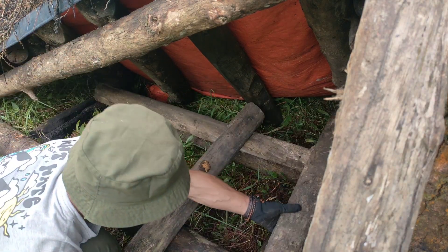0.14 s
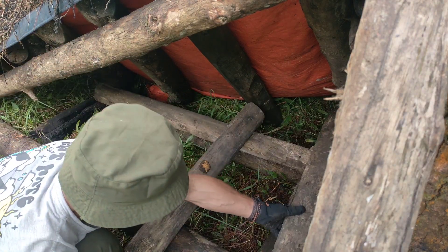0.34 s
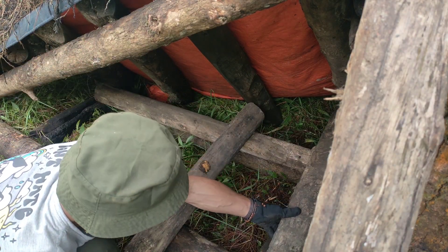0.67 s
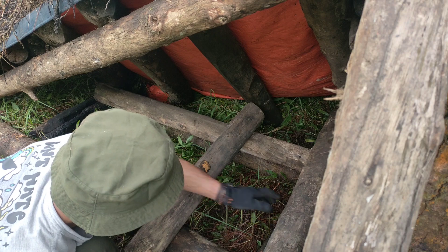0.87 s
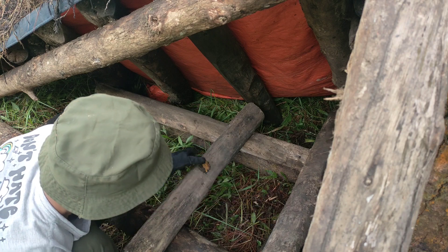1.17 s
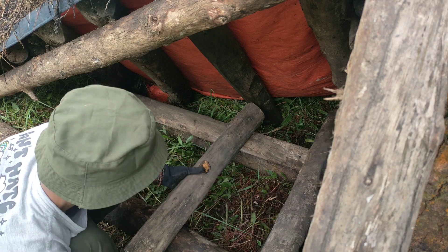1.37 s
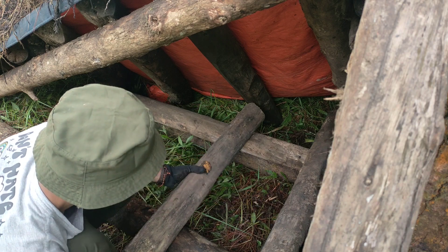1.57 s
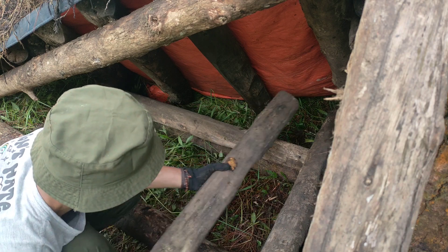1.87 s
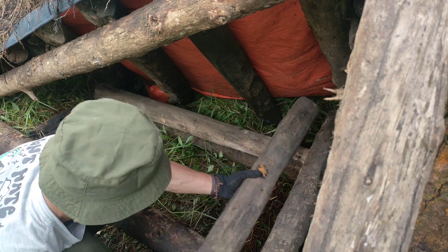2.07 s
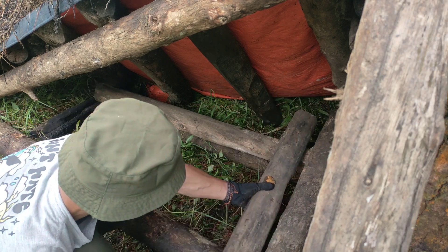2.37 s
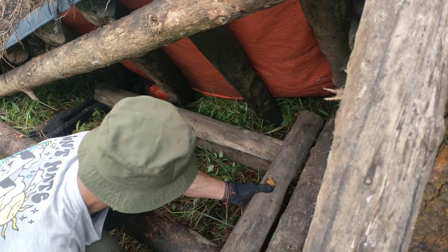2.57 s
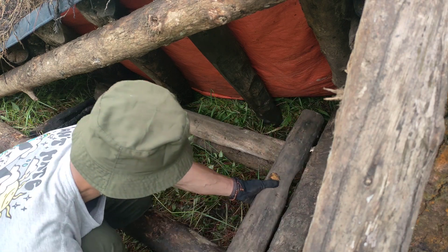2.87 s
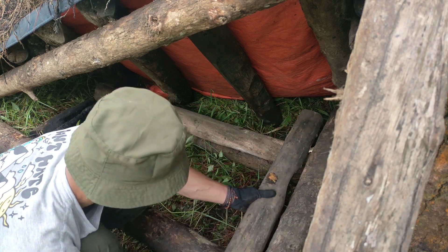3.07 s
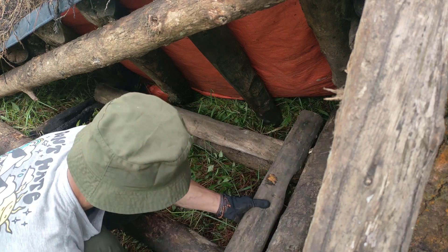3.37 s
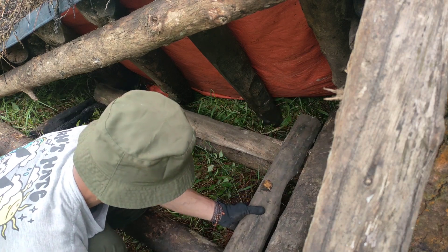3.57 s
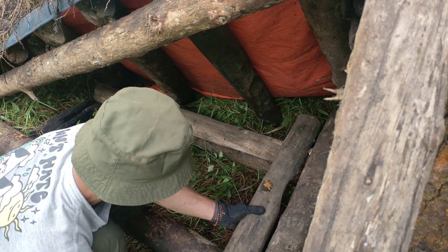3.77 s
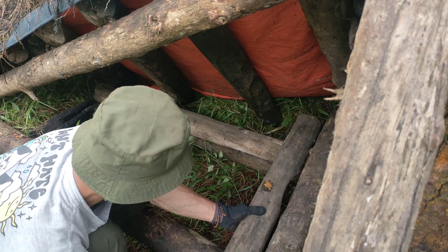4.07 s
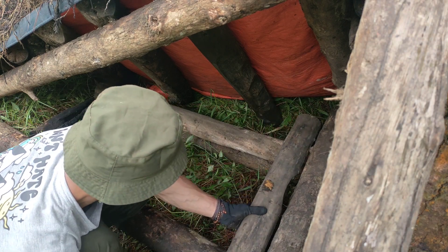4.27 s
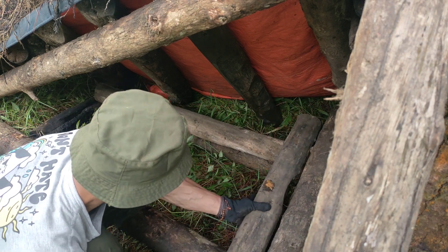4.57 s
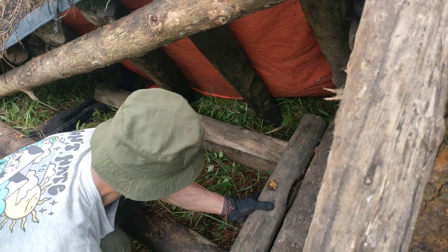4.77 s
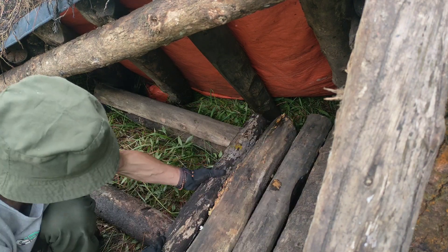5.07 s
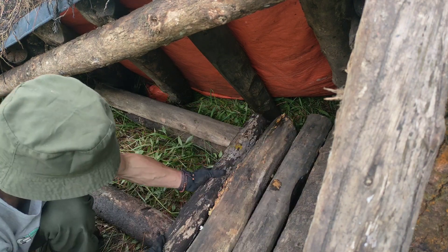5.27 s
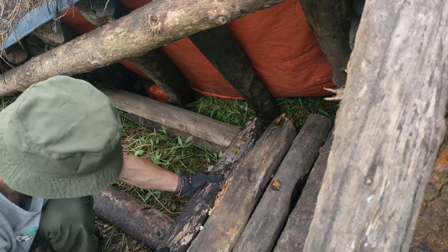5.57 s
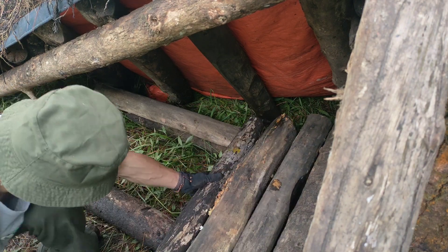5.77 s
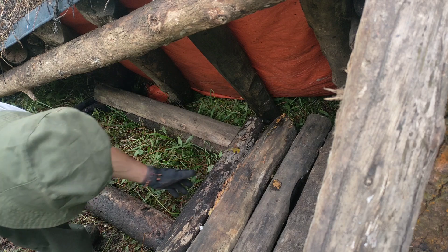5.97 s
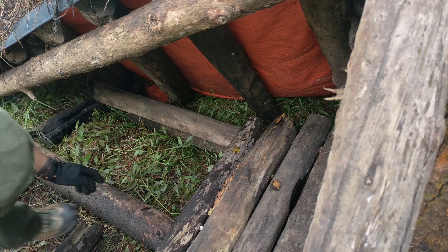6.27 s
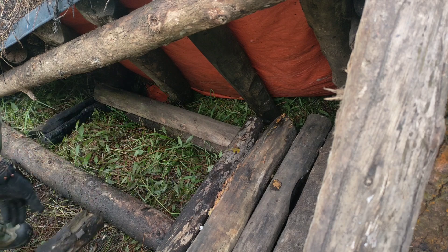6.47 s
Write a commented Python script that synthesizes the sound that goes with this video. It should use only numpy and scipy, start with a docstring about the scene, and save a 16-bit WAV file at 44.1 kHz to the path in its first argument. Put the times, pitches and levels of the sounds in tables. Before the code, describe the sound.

Outdoors, three logs are set down with short woody knocks between gritty scrapes and cloth rustle, over soft leaf hiss and rare bird chips.

```python
"""Three dry logs are laid one after another on a timber frame in a forest: each knock is a contact thud,
decaying sine modes and cracks of band noise. Noise bursts make bark ticks and low woody puffs; shaped,
gritty noise makes the rustle and scrapes of gloves and clothes; sagging sines make soft thumps. A far drone
and leaf hiss of filtered noise come from the right over an air rumble; a small bird chips in falling sines."""
import sys
import numpy as np
from scipy import signal
from scipy.fft import rfft, irfft, next_fast_len
from scipy.io import wavfile
from scipy.ndimage import uniform_filter1d

SR = 44100
rng = np.random.default_rng(int(sys.argv[2]) if len(sys.argv) > 2 else 0)


def convert_level_to_amplitude(level_db):
    """Map a level in decibels to its linear amplitude factor."""
    exponent = np.asarray(level_db, float) / 20
    return 10 ** exponent


def materialize(psi):
    """Save the field psi as 16-bit PCM at rate SR to the path in sys.argv[1].

    A 1-D psi becomes a single channel; in a 2-D psi each row is a channel.
    """
    bounded = np.clip(np.atleast_2d(psi).T, -1, 1)
    quanta = np.round(bounded * 32767).astype(np.int16)
    wavfile.write(sys.argv[1], SR, quanta)


N = 292383  # samples

# Course of the far drone. Each row: time in seconds, level in dB,
# blend from the single-band colour (0) to the many-band colour (1).
DRONE_COURSE = [(0.0, -55.5, 0.22), (0.74, -54.5, 0.22), (1.0, -56.5, 0.07), (2.23, -58, 0.47),
                (2.46, -58.5, 0.57), (3.17, -59, 0.7), (3.51, -58.5, 0.5), (3.84, -54, 0.44),
                (4.71, -52, 0.9), (4.89, -49, 0.5), (5.5, -50, 0.83), (6.39, -48, 0.5), (6.63, -47.5, 0.3)]
# Drone colour centred near 160 Hz. Each row: frequency in Hz, relative level in dB per Hz.
DRONE_SINGLE_BAND = [(59, -43), (100, -24), (162, -1), (291, -19), (350, -17.5), (389, -27), (687, -26),
                     (764, -21), (1000, -31), (1300, -53), (2200, -120)]
# Drone colour of several low humming bands. Each row: frequency in Hz, relative level in dB per Hz.
DRONE_MANY_BANDS = [(50, -34), (78, -2), (100, -5.5), (124, -18), (156, 0.5), (204, -0.5), (231, -3),
                    (265, -12.5), (280, -17.5), (357, 0.5), (389, -12), (589, -10), (648, -15.5),
                    (742, -18), (1000, -41.5), (1300, -47), (2200, -120)]
# Spectrum of the air rumble. Each row: frequency in Hz, relative level in dB per Hz.
RUMBLE_SPECTRUM = [(12, -26.5), (20, -9), (80, 0), (110, -7), (140, -20), (240, -120)]
# Swell of the air rumble. Each row: time in seconds, level in dB.
RUMBLE_COURSE = [(0.0, -67.5), (1.81, -68), (2.4, -73), (2.55, -65), (3.6, -67), (4.38, -70), (4.99, -57.5),
                 (5.32, -69), (6.52, -60.5), (6.63, -69)]
# Spectrum of the leaf hiss. Each row: frequency in Hz, relative level in dB per Hz.
HISS_SPECTRUM = [(180, -28), (300, -7.5), (383, -13.5), (430, -7.5), (515, -11.5), (763, -6), (1290, -6),
                 (1880, -6), (4390, -19), (5440, -28.5), (15000, -43)]
# Left-right likeness of the far sounds. Each row: frequency in Hz, likeness from 0 to 1.
FAR_LIKENESS = [(30, 1), (150, 0.95), (400, 0.85), (1000, 0.6), (2500, 0.45), (4000, 0.067), (15000, .05)]
# Chips of the bird. Each row: start in seconds, level in dB.
BIRD_CHIPS = [(1.307, -61.5), (2.915, -60), (4.575, -58), (6.305, -55)]
# Spectrum of gloves and cloth rubbing. Each row: frequency in Hz, relative level in dB per Hz.
CLOTH_SPECTRUM = [(290, -27), (500, 4), (1470, -3), (1830, -1.5), (2960, -3.5), (4110, -5), (6760, -16),
                  (8130, -24.5), (13800, -34.5), (15000, -31)]
# Faint stirring between swishes. Each row: time in seconds, level in dB.
STIR_COURSE = [(0, -65), (1.15, -77.5), (1.4, -85), (2.6, -68), (3.1, -71.5), (4.6, -61), (5.4, -63.5),
               (5.6, -68), (6.63, -63)]
# Swishes of gloves on bark, cloth and grass.
# Each row: start in seconds, hold in seconds, level in dB, tilt in dB per octave.
GLOVE_SWISHES = [(0.024, 0.16, -58.5, 7.5), (0.513, .13, -64.5, 6.5), (0.682, .3, -70, -.6),
                 (1.2, 0.058, -64, -7), (1.897, 0.21, -68, 0.5), (2.344, 0.14, -60, -1.5),
                 (2.831, 0.11, -57, 0.6), (3.202, 0.16, -57, 4.5), (3.466, .08, -61, 5),
                 (3.624, 0.096, -58.5, 4.5), (3.795, 0.084, -52.5, 6), (4.02, 0.11, -61, 5),
                 (4.168, 0.096, -48, 5.5), (4.307, 0.11, -55.5, 2.5), (4.42, 0.14, -54.5, 7),
                 (4.719, .03, -51.5, -2), (4.815, .17, -55, 3), (5.206, 0.044, -50.5, 4.5),
                 (5.716, 0.018, -53.5, 3.5), (5.962, 0.24, -60, 1), (6.245, 0.053, -56, 6),
                 (6.356, 0.083, -59, 4), (6.476, 0.11, -66, 6)]
# Short gritty strokes of a glove on bark. Each row: start in seconds, length in seconds, level in dB,
# centre in Hz, ratio from the centre to each band edge.
GLOVE_SCRAPES = [(.522, 0.082, -51, 2750, 2.05), (4.003, .035, -51, 3900, 1.35),
                 (4.12, 0.13, -45.5, 3780, 1.18), (2.392, 0.067, -52, 1860, 2.3)]
# A knee or boot on soft ground. Each row: start in seconds, level in dB, first pitch in Hz,
# time scale in seconds (the sound lasts three times this).
GROUND_THUMPS = [(3.489, -33.5, 89, 0.025), (5.81, -45, 88, .035)]
# Ticks of bark and twig, and low woody puffs of the log knocks. Each row: time in seconds, level in dB,
# centre in Hz, ratio from the centre to each band edge, left over right in dB.
TICKS_AND_PUFFS = [(0.1364, -38.5, 5900, 1.42, 4), (.2304, -54, 6000, 1.8, -1.),
                   (.2614, -57, 5000, 1.14, 0), (.531, -48, 1005, 1.05, -2), (.604, -46, 4600, 1.5, 0),
                   (.809, -52, 4960, 1.23, 1.), (.895, -55, 5500, 1.12, 0), (1.2534, -64, 6500, 2.4, -2.),
                   (2.3311, -65, 5470, 1.1, 2.), (2.349, -44, 4130, 1.24, 1.),
                   (2.388, -46.5, 6000, 1.17, 9), (2.442, -34.5, 700, 1.24, 0),
                   (2.502, -48.5, 4000, 1.34, 1.), (2.5587, -50, 4430, 1.29, 9),
                   (2.7294, -33, 4300, 1.43, 3.5), (2.732, -54.5, 1040, 0.99, -3),
                   (2.9018, -47, 2500, 1.7, 0), (3.24, -45, 5040, 1.33, 1.), (3.3096, -44.5, 3600, 1.2, 6),
                   (3.477, -42, 3920, 1.2, -4), (3.6133, -52, 4500, 1.2, 2.), (3.804, -40, 5700, 1.35, 2),
                   (3.887, -42, 990, 1.7, 3), (3.893, -40, 5500, 1.08, 2), (4.0794, -49, 3500, 2.1, 0),
                   (4.441, -45, 6140, 1.06, 8), (4.727, -37.5, 850, 1.7, -6), (6.166, -39, 2710, 1.32, 4),
                   (6.217, -54, 3700, 1.1, -2.)]
# Blows of the logs. Each row: time in seconds, thud level in dB, thud pitch in Hz,
# thud time scale in seconds (its envelope peaks at twice this), ring level in dB, crack level in dB.
LOG_KNOCKS = [(0.137, -37, 170, .0018, -29, -38), (.16, -35, 295, 0.0018, -33, -54),
              (.181, -43, 231, 0.0033, -54, -67), (0.602, -46.5, 279, 0.0064, -58, -48.5),
              (2.3882, -15.5, 269, 0.0014, -21, -40.5), (2.4406, -16.5, 248, 0.0013, -27.5, -42.5),
              (2.842, -39.5, 183, .0017, -52, -51), (3.478, -37, 123, 0.0011, -66, -42.5),
              (3.68, -43, 222, 0.0019, -63, -60), (4.078, -32.5, 200, 0.00099, -53.5, -44),
              (4.407, -43, 200, .0016, -57.5, -48.5), (4.698, -40, 182, 0.0062, -47.5, -48),
              (4.728, -35.5, 304, 0.0018, -50, -47), (4.821, -35.5, 219, 0.0056, -42, -58),
              (4.8327, -21.5, 273, 0.0048, -23.5, -49), (4.896, -31.5, 182, 0.00094, -58, -51),
              (4.9969, -17.5, 285, 0.003, -27, -50), (5.905, -43.5, 180, .0043, -63, -55)]
# Modes of what rings: first log, second log, third log against the second, third log on the frame.
# Each row of a body: frequency in Hz, relative level in dB, 60 dB decay time in seconds.
BODY_MODES = [
    [(156.4, 1, 0.1), (237.5, 4, 0.22), (335, -8, 0.083), (459.4, -1.5, 0.13), (572, -13, 0.069),
     (730, -17, 0.046), (1050, -21.5, 0.07), (1200, -25.5, 0.054)],
    [(180, -17.5, 0.14), (280.5, -16.5, 0.41), (382.5, 4, 0.15), (461, -8, 0.16), (539, -9.5, 0.04),
     (660, -29, 0.0095), (784, 0.5, 0.092), (998, -9, 0.13), (1080, -23, 0.12), (1234, -20, 0.079),
     (2010, -21, .06), (2970, -26, 0.077)],
    [(200, -10, 0.21), (275.7, 2, 0.12), (383, -14, 0.2), (463, -18.5, 0.16), (660, -9.5, 0.03),
     (974, -20.5, 0.088), (1035, -17.5, 0.039), (1730, -28, 0.033), (2430, -29, 0.032)],
    [(170, 3.5, 0.077), (262, -6.5, 0.31), (285, 1.5, 0.1), (317, -10, 0.082), (470, -14.5, 0.15),
     (798, -22, 0.18), (1040, -23, .05)],
]
# When the next ringing body takes over, in seconds.
NEXT_BODY_S = [1.5, 4.5, 4.95]
# Contact time before the ring, in seconds, one value for each body.
BODY_CONTACT_S = [0.00034, .0042, 0.00091, .002]
# Hardness of the blow, in dB per octave, one value for each body.
BODY_HARDNESS = [5, -3, 4, 1]
# How the logs radiate to the two ports. Each row: frequency in Hz, left over right in dB.
LOG_LEAN = [(60, 0.5), (130, -3.5), (290, 3.5), (630, -2), (1390, -3.5), (3040, 4), (6670, 1.0),
            (14600, 2.5)]
# Overall tone, with a dip near 8 kHz and a steep top cutoff. Each row: frequency in Hz, gain in dB.
OVERALL_TONE = [(20, 4.5), (7000, -1.5), (7900, -8), (8800, -3.5), (15000, -1.5), (15150, -11.5),
                (15300, -65.5), (22050, -60)]


def evened(x):
    """Scales to rms 1."""
    return x / np.sqrt(np.mean(x ** 2) + 1e-20)


def read(points, hz):
    """Reads a spectrum on a log-frequency axis."""
    f, value = np.transpose(points)
    return np.interp(np.log(hz + 1), np.log(f + 1), value)


def add(mix, s, sound):
    """Mixes a two-channel sound in at time s."""
    part = mix[:, round(s * SR):][:, :sound.shape[-1]]
    part += sound[..., :part.shape[1]]


def seconds(length_s):
    """Sample times of a sound."""
    return np.arange(round(length_s * SR)) / SR


def field(size):
    """Bin frequencies as a column and frame times of a short-time spectrum."""
    return np.fft.rfftfreq(size, 1 / SR)[:, None], np.arange(4 * N // size + 5) * size / 4 / SR


def unit(db):
    """Shifts a dB spectrum so that its bins sum to power 1."""
    return db - 10 * np.log10((convert_level_to_amplitude(db) ** 2).sum(axis=0))


def noise(db, same, lag_s, patchy_db, flicker_db, size, patch):
    """Two-port noise on a frequency-by-time dB shape, left lagging, with random patches and wide flicker."""
    hz, t = field(size)
    bins, frames = patch
    a, b, c, d, patches = rng.standard_normal((len(t), len(hz), 5)).T
    patches = uniform_filter1d(patches, size=bins, axis=0)
    patches = evened(uniform_filter1d(patches, size=frames, axis=1))
    same = np.clip(same, 0, 1)
    right = a + 1j * b
    left = same * right + np.sqrt(1 - same ** 2) * (c + 1j * d)
    left = left * np.exp(-2j * np.pi * hz * lag_s)
    flicker = flicker_db * rng.standard_normal(len(t))  # all pitches together
    spectra = np.array([left, right]) * convert_level_to_amplitude(db + patchy_db * patches + flicker)
    out = signal.istft(spectra, nperseg=size, noverlap=3 * size // 4)[1][:, :N]
    return out / np.sqrt(2 / 3 * 2)  # evens out the overlap of the windows


def band(length, hz, spread, share):
    """Band noise for both ports, partly shared, rms 1."""
    shared, *own = rng.standard_normal((3, length))
    edges = np.clip([hz / spread, hz * spread], 100, SR / 2.2)
    sos = signal.butter(2, edges, "bandpass", fs=SR, output="sos")
    return evened(signal.sosfilt(sos, share * shared + 0.88 * np.array(own)))


def grit(length, per_s, spread_db, bed):
    """A gain of rms 1 made of small random slips, each dying in about 0.5 ms, over a smooth bed."""
    happens = rng.random(length) < per_s / SR
    strength = np.minimum(rng.exponential(1, length), 4)
    fall = np.exp(-1 / (0.0005 * SR))
    slips = signal.lfilter([1], [1, -fall], convert_level_to_amplitude(spread_db * strength) * happens)
    return evened(bed + slips)


def burst(db, hz, t60, spread):
    """A burst of band noise that rises in about a millisecond and dies fast."""
    t = seconds(0.08)
    decay = convert_level_to_amplitude(db - 60 * t / max(t60, 0.005))
    rise = 1 - np.exp(-t / 0.0011)
    return decay * rise * band(len(t), hz, max(spread, 1.05), share=0.78)


def far_noise(db, same, lag_s, patchy_db, flicker_db):
    """Noise in long frames with wide patches, for slowly changing background sounds."""
    return noise(db, same, lag_s, patchy_db, flicker_db, size=2048, patch=(8, 8))


def rumble():
    """Air rumble on the ports: deep noise that swells and sinks."""
    hz, t = field(2048)
    db = unit(read(RUMBLE_SPECTRUM, hz)) + np.interp(t, *np.transpose(RUMBLE_COURSE))
    return far_noise(db, 0.94, 0, 2.3, 2.6)


def drone_and_hiss():
    """A low drone that blends between two colours, and a hiss of far leaves that partly follows its level."""
    hz, t = field(2048)
    s, *columns = np.transpose(DRONE_COURSE)
    level_db, blend = (np.interp(t, s, column) for column in columns)
    blend = np.clip(blend, 0, 1)
    colour = (1 - blend) * read(DRONE_SINGLE_BAND, hz) + blend * read(DRONE_MANY_BANDS, hz)
    drone_db = unit(colour) + level_db
    hiss_db = unit(read(HISS_SPECTRUM, hz)) - 57 + 0.65 * (level_db + 57)  # shares the drone's swell
    same, lag_s = read(FAR_LIKENESS, hz), 0.00042  # reaches the left port later
    return far_noise(drone_db, same, lag_s, 1.63, 0.9) + far_noise(hiss_db, same, lag_s, 1.0, 0.47)


def chip(db):
    """One falling whistle of a small bird, with a faint smear from the trees."""
    t = seconds(0.0297)
    hz = 4700 - 550 * (t / t[-1]) ** 1.1
    note = np.sin(2 * np.pi * np.cumsum(hz) / SR) * np.sqrt(np.hanning(len(t)))
    tail_s = np.arange(SR // 4) / SR
    trees = rng.standard_normal((2, len(tail_s))) * convert_level_to_amplitude(-28.5 - 60 * tail_s / 0.19)
    trees[:, 0] = 1  # the direct sound
    return convert_level_to_amplitude(db) * signal.fftconvolve(note[None], trees, axes=1)


def rustle():
    """Patchy, crackly friction noise; each swish swells, holds and fades with its own brightness."""
    hz, t = field(256)
    bump_db = 1.5 * np.exp(-(np.log2((hz + 1) / 3500) / 0.18) ** 2)
    cloth_db = read(CLOTH_SPECTRUM, hz) + bump_db
    octaves = np.log2((hz + 100) / 4500)
    stir_db = np.interp(t, *np.transpose(STIR_COURSE))
    power = convert_level_to_amplitude(unit(cloth_db + 0.5 * octaves) + stir_db) ** 2
    for s, hold, db, tilt_db in GLOVE_SWISHES:
        swell = 192 * np.maximum(s - t, 0)  # dB per second
        fade = 213 * np.maximum(t - s - hold, 0)
        power = power + convert_level_to_amplitude(unit(cloth_db + tilt_db * octaves)) ** 2 * convert_level_to_amplitude(db - swell - fade) ** 2
    rubbing = noise(10 * np.log10(power), 0.24, 0.00019, 3.46, 0.54, size=256, patch=(2, 16))
    return rubbing * grit(N, per_s=130, spread_db=3.7, bed=2.6) * convert_level_to_amplitude([[0.8], [-0.8]])


def scrape(length, db, hz, spread):
    """One glove stroke on bark: gritty band noise that swells and fades."""
    t = seconds(0.2)
    stroke = np.abs(np.sin(np.pi * np.clip(t / length, 0, 1) ** 0.7)) ** 1.05
    gritty = band(len(t), hz, spread, share=0.44) * grit(len(t), per_s=400, spread_db=3.6, bed=1.6)
    return convert_level_to_amplitude(db) * stroke * gritty


def thump(db, hz, length):
    """A soft low push whose pitch sags as the ground gives."""
    t = seconds(3 * length)
    sag = 16  # per second
    turns = hz / sag * (1 - np.exp(-sag * t))
    push = (t / length * 2.23 * np.exp(1 - t / length * 2.5)) ** 1.4
    fade = np.hanning(2 * len(t))[len(t):]
    return convert_level_to_amplitude(db) * push * fade * np.sin(2 * np.pi * turns)


def tick_or_puff(db, hz, spread, pan_db):
    """A tick of bark or twig, or a woody puff: a noise burst that rings longer the narrower its band."""
    t60 = 0.017 + 9.7 / (hz * max(spread - 1 / spread, 0.1))
    return burst(db, hz, t60, spread) * convert_level_to_amplitude([[pan_db / 2], [-pan_db / 2]])


def contact_thud(t, db, hz, length):
    """The damped push of the contact; a small body sends out no deep bass."""
    envelope = (t / length / 2 * np.exp(1 - t / length / 2)) ** 2
    thud = convert_level_to_amplitude(db) * envelope * np.sin(2 * np.pi * hz * t)
    return signal.lfilter(*signal.butter(2, 0.3 * hz, "highpass", fs=SR), thud)


def log_ring(t, s, ring_db):
    """Decaying sine modes of the log in hand, weighted by the hardness of the blow, at the two ports."""
    body = np.searchsorted(NEXT_BODY_S, s)
    hz, db, t60 = np.array(BODY_MODES[body]).T[:, :, None]
    # a blow soon after a stronger one is duller
    rebound = any(0 < s - row[0] < 0.07 and row[4] > ring_db for row in LOG_KNOCKS)
    hard_db = BODY_HARDNESS[body] - 5 * rebound
    free = np.maximum(t - BODY_CONTACT_S[body], 0)  # the log rings once the contact lets go
    mode_db = ring_db + db + hard_db * np.log2(hz / 300) - 60 * free / t60
    modes = convert_level_to_amplitude(mode_db) * np.sin(2 * np.pi * hz * free)
    modes *= 1 - np.exp(-free / 0.0023)
    # the next contact damps the upper modes
    touch = min([row[0] - s for row in LOG_KNOCKS if row[0] > s] + [t[-1]])
    modes *= convert_level_to_amplitude(-7 * np.log2(hz / 190) * np.clip((t - touch) / 0.01, 0, 1))
    lean = convert_level_to_amplitude(read(LOG_LEAN, hz) / 2)
    return np.array([(modes * lean).sum(axis=0), (modes / lean).sum(axis=0)])


def knock(s, thud_db, thud_hz, length, ring_db, crack_db):
    """A damped thud of the contact, the modes of the log in hand, a woody puff and a crack of bark."""
    t = seconds(0.4)
    out = contact_thud(t, thud_db, thud_hz, length) + log_ring(t, s, ring_db)
    add(out, 0.002, burst(ring_db - 18, 460, 0.11, 2.1))  # the dense small modes of rough timber
    add(out, 0.0012, burst(crack_db, 1970, 0.049, 1.89))
    return out


def shelter(x):
    """Adds short scattered reflections from the timbers, different at each port."""
    t = seconds(0.2)
    taps = rng.standard_normal((2, len(t))) * convert_level_to_amplitude(-60 * t / 0.057) * (t > 0.003)
    taps = signal.lfilter(*signal.butter(1, 450, "highpass", fs=SR), taps)  # thin timbers scatter little bass
    taps = taps / np.linalg.norm(taps[0])
    return x + convert_level_to_amplitude(-21) * signal.fftconvolve(x, taps, axes=1)[:, :N]


def scene():
    """All sources at the two microphone ports."""
    far, near = rumble() + drone_and_hiss(), np.zeros((2, N))
    for s, db in BIRD_CHIPS:
        add(far, s, chip(db))
    for s, *stroke in GLOVE_SCRAPES:
        add(near, s, scrape(*stroke))
    for s, *push in GROUND_THUMPS:
        add(near, s, thump(*push))
    for s, *wood in TICKS_AND_PUFFS:
        add(near, s - 0.0005, tick_or_puff(*wood))
    for row in LOG_KNOCKS:
        add(near, row[0], knock(*row))
    return far + rustle() + shelter(near)


def band_limit(x):
    """A steep low-pass at the top of the band."""
    return signal.sosfilt(signal.butter(12, 15230, fs=SR, output="sos"), x)


def record(dry):
    """Filters the mix to the overall tone, with its dip near 8 kHz and steep top cutoff."""
    length = next_fast_len(N)
    tone = convert_level_to_amplitude(read(OVERALL_TONE, np.fft.rfftfreq(length, 1 / SR)))
    mix = irfft(rfft(dry, length) * tone, length)[:, :N]
    return band_limit(mix)


dry = scene()
out = record(dry)
materialize(out)
```